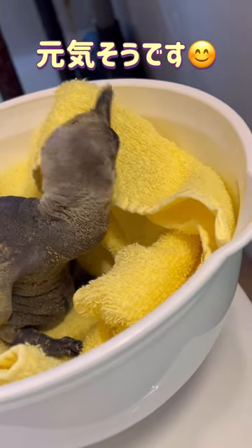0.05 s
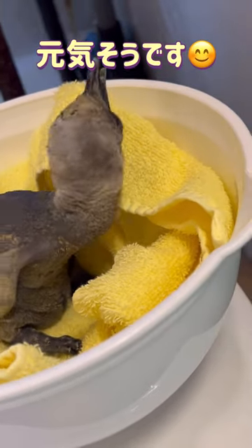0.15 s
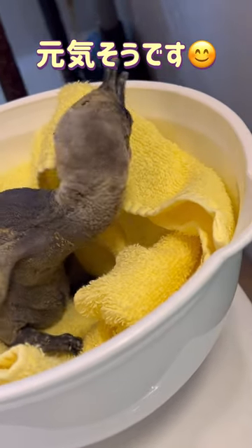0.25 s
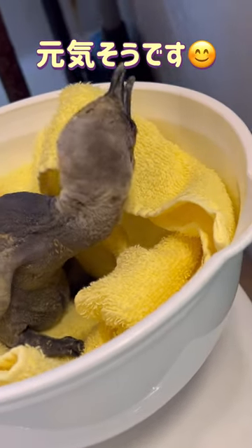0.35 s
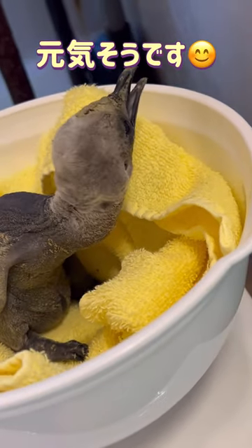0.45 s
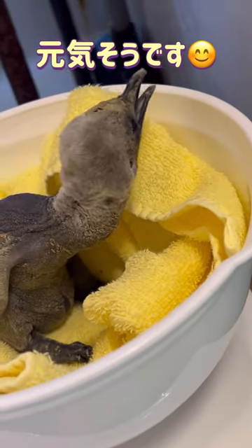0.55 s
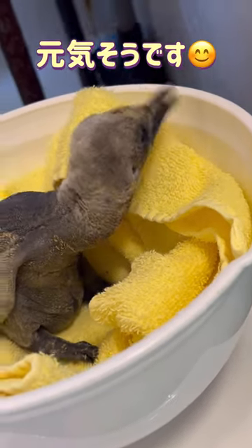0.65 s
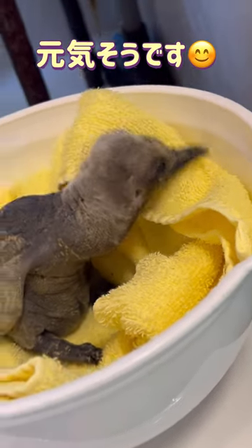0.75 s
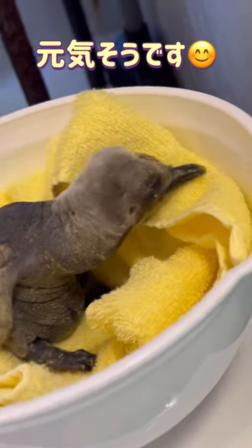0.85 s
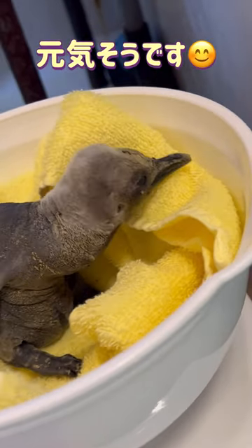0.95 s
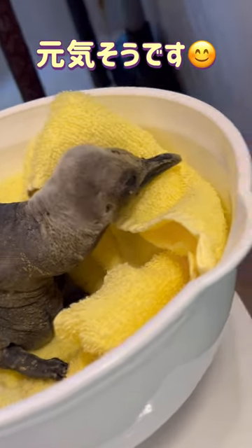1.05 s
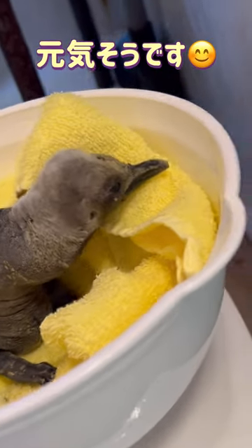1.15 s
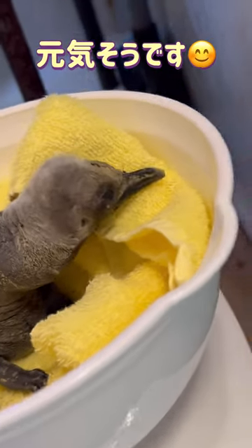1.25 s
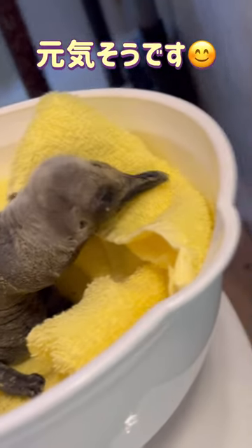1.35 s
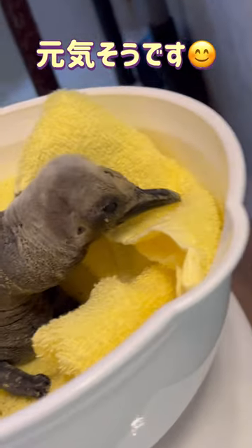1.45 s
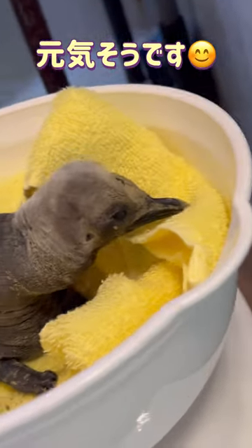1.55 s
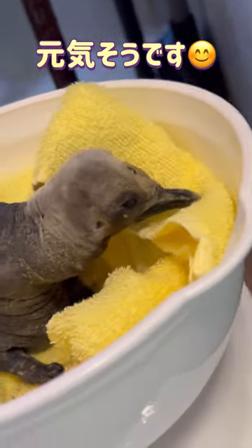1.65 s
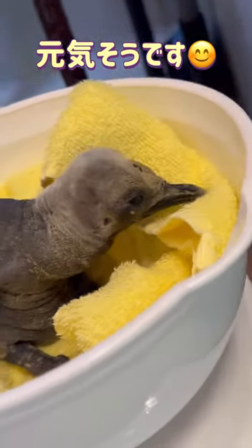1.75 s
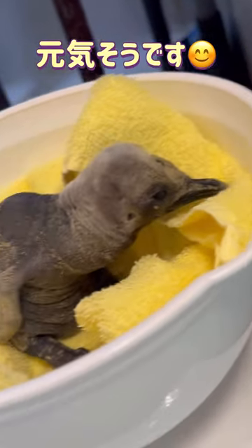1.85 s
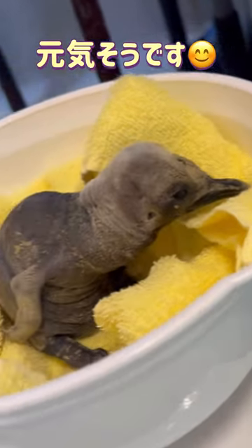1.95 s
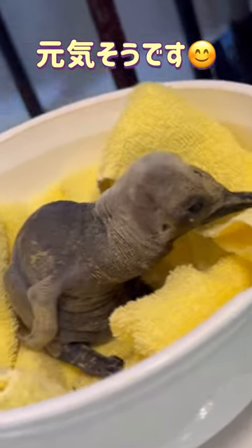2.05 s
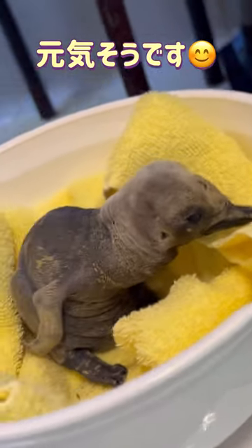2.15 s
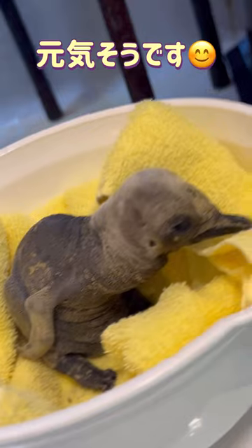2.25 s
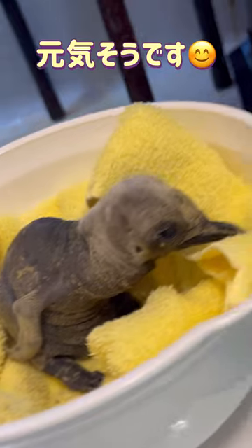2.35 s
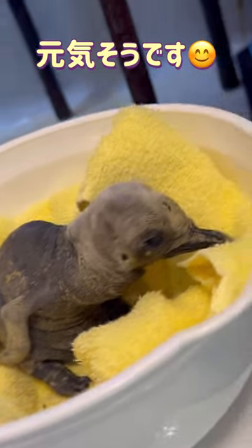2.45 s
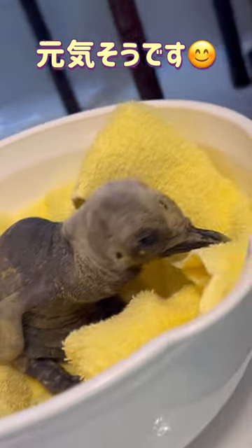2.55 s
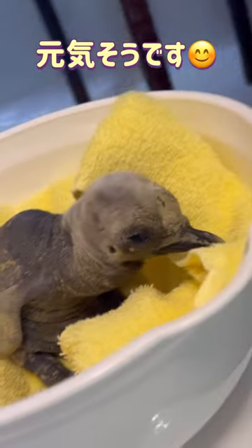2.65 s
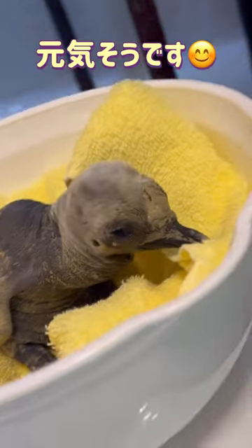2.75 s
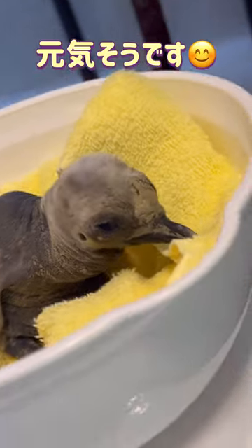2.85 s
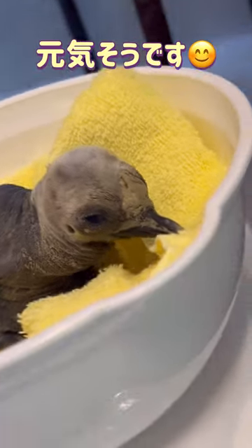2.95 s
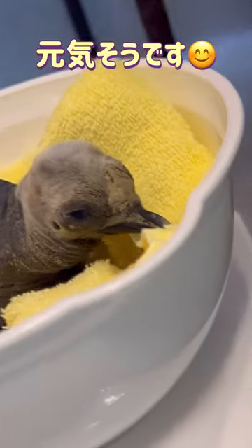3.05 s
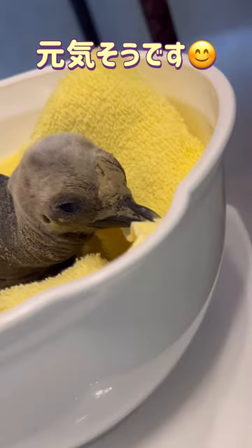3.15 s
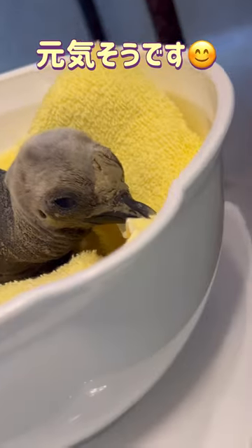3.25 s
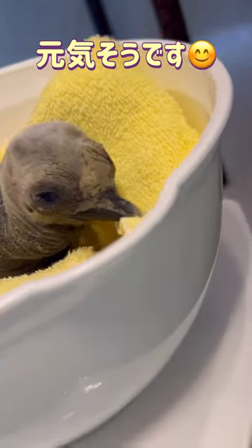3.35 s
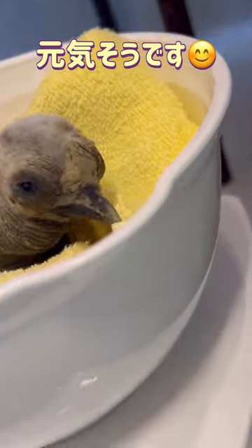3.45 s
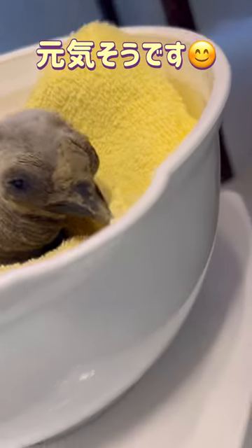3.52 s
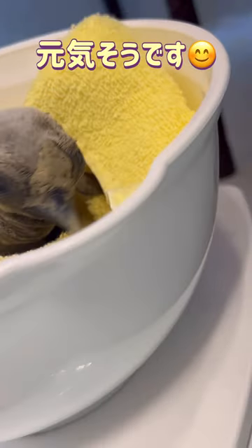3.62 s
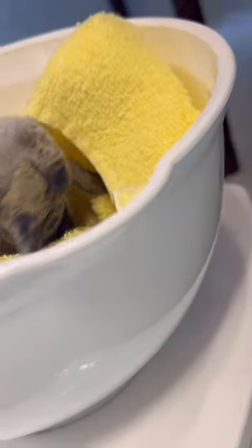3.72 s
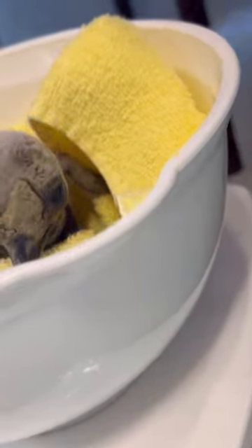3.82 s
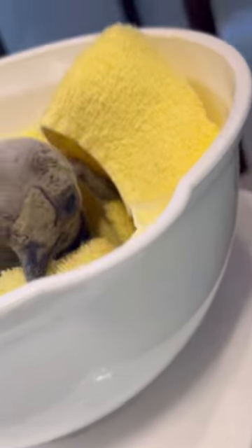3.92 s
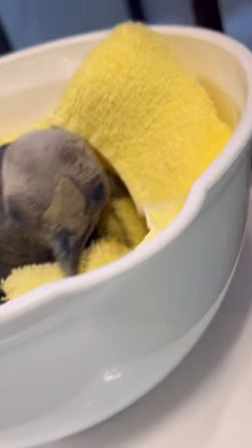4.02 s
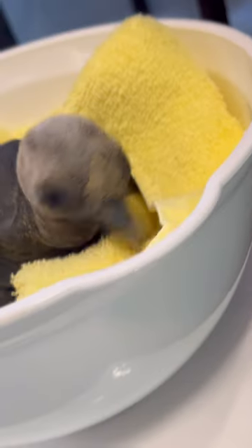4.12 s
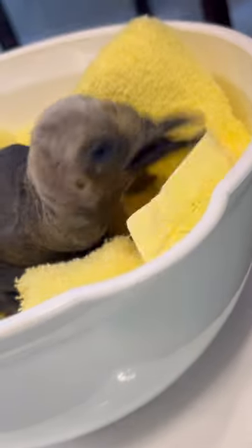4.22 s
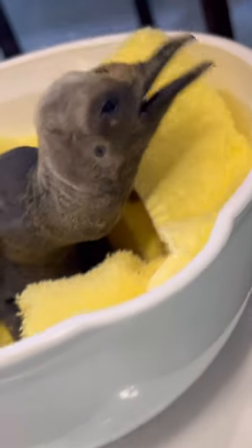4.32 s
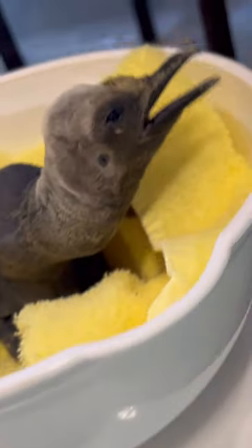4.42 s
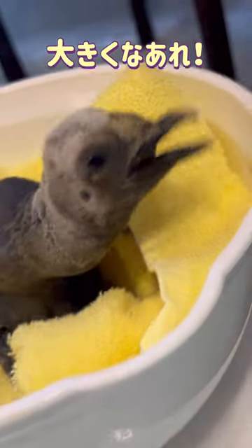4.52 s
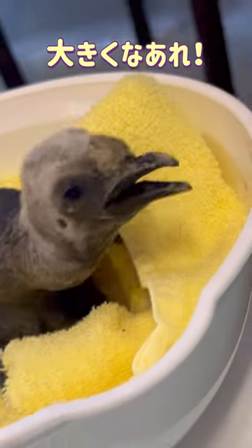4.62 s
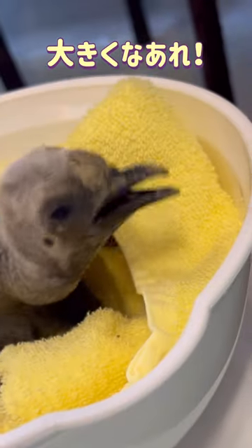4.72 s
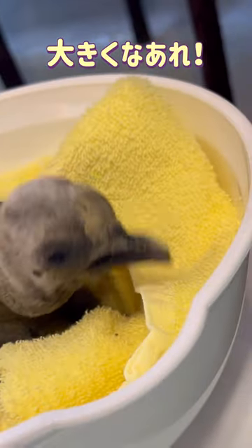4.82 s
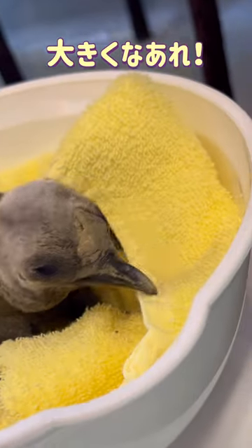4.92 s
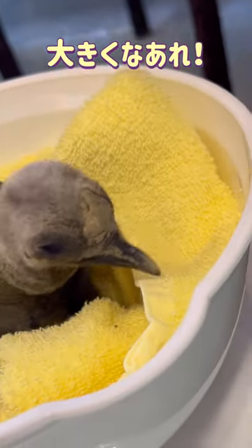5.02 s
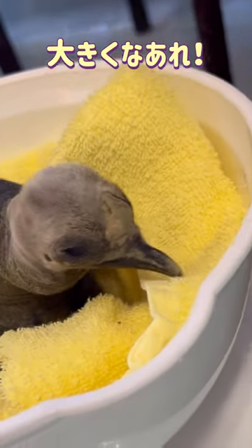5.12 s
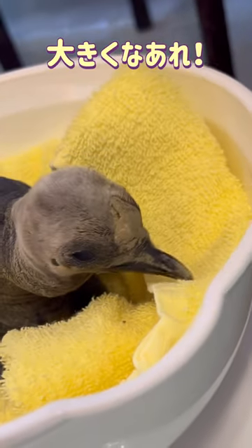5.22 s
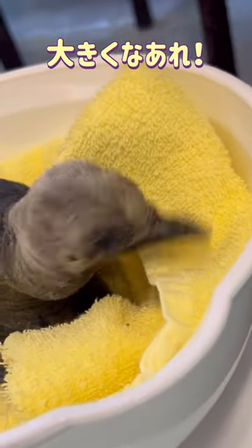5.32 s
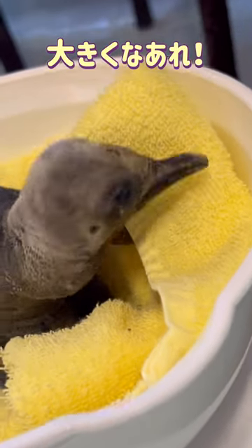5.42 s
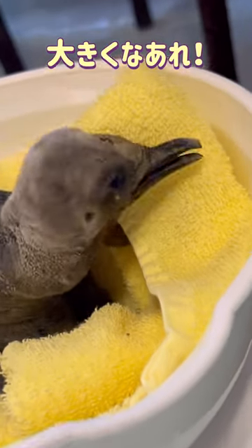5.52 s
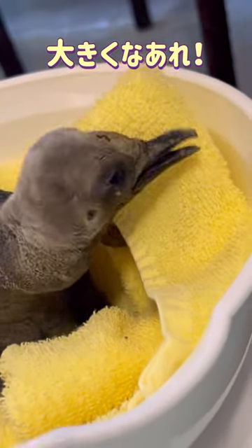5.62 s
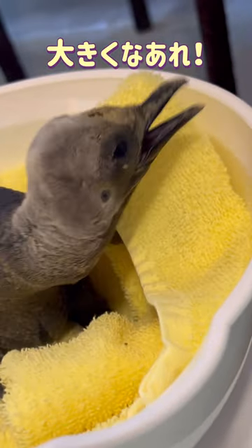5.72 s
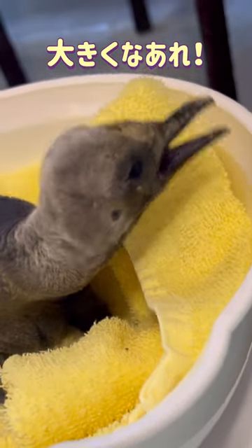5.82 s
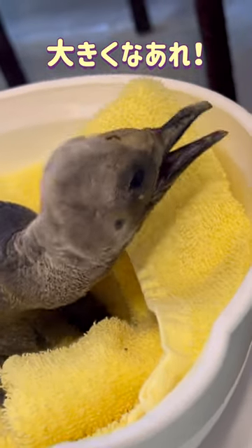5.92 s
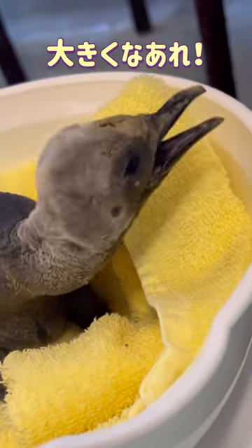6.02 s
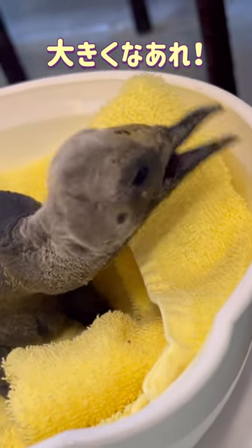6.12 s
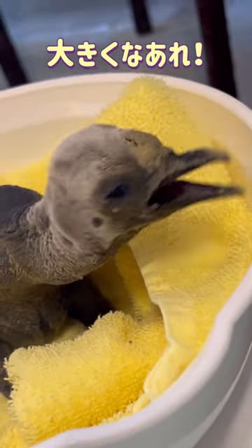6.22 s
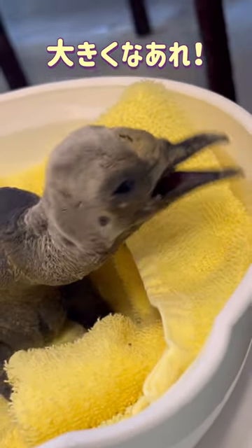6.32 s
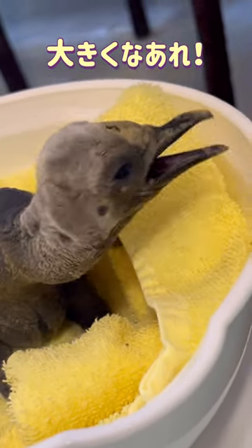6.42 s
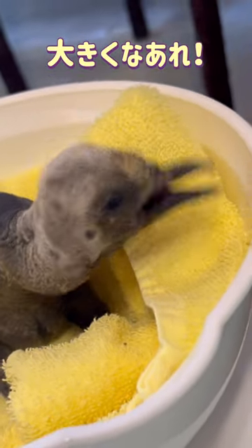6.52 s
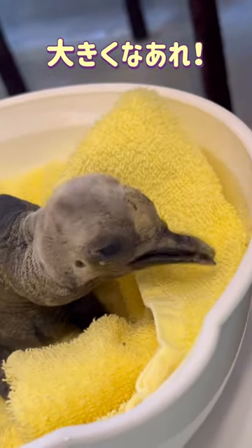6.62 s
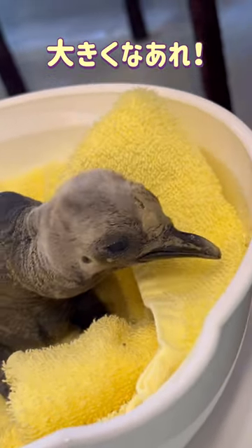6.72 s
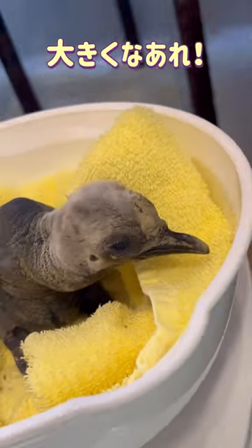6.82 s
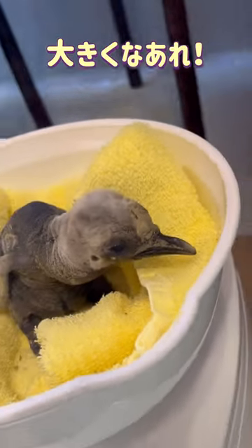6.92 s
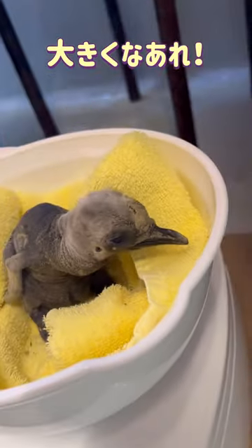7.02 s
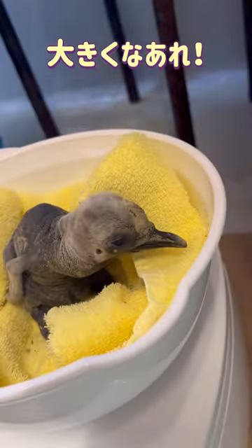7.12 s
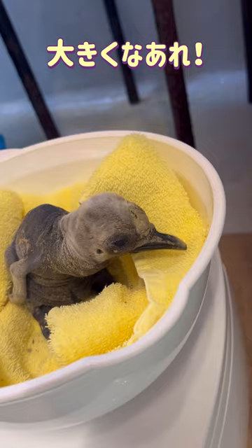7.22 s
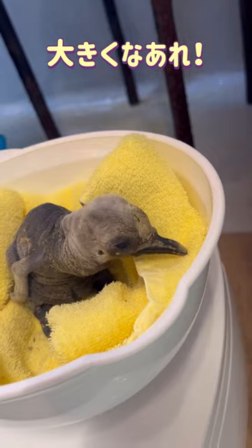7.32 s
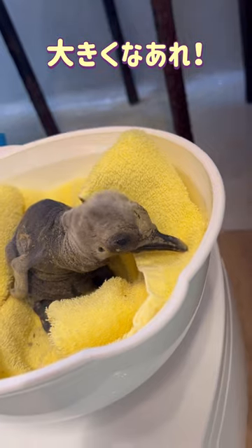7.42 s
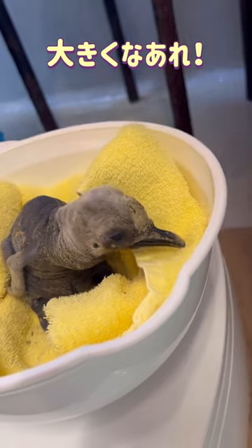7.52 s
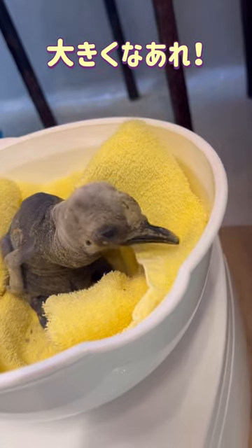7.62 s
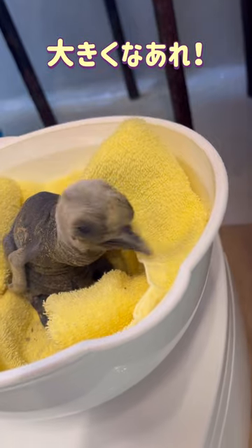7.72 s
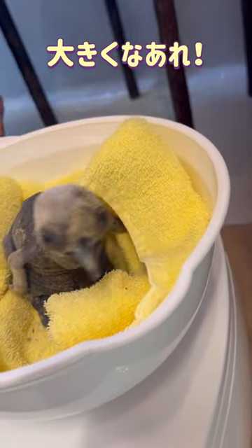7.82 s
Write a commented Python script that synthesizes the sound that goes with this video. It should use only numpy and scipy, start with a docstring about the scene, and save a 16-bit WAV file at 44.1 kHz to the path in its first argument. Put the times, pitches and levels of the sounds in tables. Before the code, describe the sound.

Steady ventilation drones indoors, its deep tones slowly beating. A baby bird gives one rough, broken whistle at the start, stays quiet while a small knock and very faint tick and cloth brush pass, then peeps rapidly three times, and soon after three more. Brief hard-walled echo follows the calls; a soft rustle closes the scene, heard by a nearby phone.

```python
"""Three bursts of hoarse, high whistles from a penguin chick ring briefly in a small hard room.
The voice is a membrane whistle with subharmonic repeats, throat rasp and breath noise.
Ventilation drones on: a wavering bass hum of two tones, a motor tone, duct resonances and a broad hiss.
A knock, two faint ticks and a brush are short noise bands; a late rustle is two swells of noise.
A phone with two microphone ports listens and filters their sum and difference."""
import sys
import numpy as np
from scipy import signal
from scipy.fft import rfft, irfft
from scipy.io import wavfile
from scipy.ndimage import uniform_filter1d

SR = 44100
rng = np.random.default_rng(int(sys.argv[2]) if len(sys.argv) > 2 else 0)


def dump(signal):
    """Clip the signal to [-1, 1] and save it as 16-bit WAV at the path in sys.argv[1]."""
    limited = np.clip(np.atleast_2d(signal).T, -1, 1)
    pcm = np.round(limited * 32767).astype(np.int16)
    wavfile.write(sys.argv[1], SR, pcm)


N = 346626

# Spells where the membrane repeats every two ("pairs") or three ("threes") cycles.
# Each row: start in seconds, end in seconds, kind of repeat, level in dB against the whistle.
REPEAT_SPELLS = [(0.219, 0.282, "pairs", -12.5), (0.294, 0.354, "threes", -23.),
                 (0.427, 0.476, "threes", -23), (0.468, .515, "threes", -15.5), (.53, 0.555, "pairs", -18),
                 (4.238, 4.285, "threes", -16), (4.294, 4.36, "pairs", -14.5),
                 (4.439, 4.475, "threes", -24), (4.53, 4.542, "threes", -21),
                 (4.555, 4.586, "threes", -17.5), (4.6, 4.623, "threes", -14.5),
                 (5.705, 5.836, "threes", -19), (5.766, 5.855, "pairs", -17), (5.988, 6.047, "threes", -18),
                 (6.184, 6.201, "threes", -23), (6.221, 6.222, "threes", -2), (6.289, 6.293, "threes", -5.),
                 (6.301, 6.349, "threes", -16.5), (6.29, 6.393, "pairs", -17)]
SPELL_RAMP_S, SPELL_FLOOR_DB = 0.0059, -53.5


def from_db(db):
    """Amplitude ratio of a level in dB."""
    return 10 ** (np.asarray(db) / 20)


def rms_one(x):
    """Scale to an rms of 1 over the whole length."""
    return x / np.sqrt(np.mean(x ** 2) + 1e-20)


def in_time(rows):
    """Rows of (second, values..) as one interpolated curve per value."""
    s, *columns = np.transpose(rows)
    return [np.interp(np.arange(N) / SR, s, c) for c in columns]


def between(t0, t1, rise_s, fall_s):
    """Up to 1 inside the span, with a linear ramp centred on each end."""
    t = np.arange(N) / SR
    return np.clip(np.minimum((t - t0) / rise_s + .5, (t1 - t) / fall_s + .5), 0, 1)


def coloured(spectrum):
    """Noise of the given spectrum, interpolated over log frequency; rms 1."""
    hz, level_db = np.transpose(spectrum)
    grid_hz = np.maximum(np.arange(N // 2 + 1) * SR / N, 1)
    gain = from_db(np.interp(np.log(grid_hz), np.log(hz), level_db, left=-90, right=-90))
    return rms_one(irfft(rfft(rng.standard_normal(N)) * gain, N))


def resonate(x, hz, width_hz):
    """Two passes through one resonance: steep skirts."""
    r = np.exp(-np.pi * width_hz / SR)
    b = np.array([1, 0, -1]) * (1 - r * r) / 2
    a = [1, -2 * r * np.cos(2 * np.pi * hz / SR), r * r]
    return signal.lfilter(b, a, signal.lfilter(b, a, x))


def band(x, low_hz, high_hz, order):
    """Butterworth bandpass."""
    return signal.sosfilt(signal.butter(order, [low_hz, high_hz], "band", fs=SR, output="sos"), x)


def wobble(rate_hz):
    """Random drift below rate_hz; rms 1."""
    return rms_one(signal.sosfilt(signal.butter(2, rate_hz, fs=SR, output="sos"), rng.standard_normal(N)))


def sine(cycles, level_db):
    """Sine of the given phase in cycles; the level is the rms."""
    return np.sqrt(2) * from_db(level_db) * np.sin(2 * np.pi * cycles)


def evened(x, window_s):
    """Rms held near 1 from moment to moment."""
    return x / np.sqrt(uniform_filter1d(x ** 2, size=max(round(window_s * SR), 1)) + 1e-12)


def chick():
    """A membrane whistle that slips into repeats of two or three cycles, with turbulent air in the throat."""
    # One curve per peep. Each row: time in seconds, whistle pitch in Hz, whistle level in dB,
    # throat rasp level in dB, octave level in dB.
    peeps = [
        [(0.198, 2863, -58, -33, -59), (0.218, 2874, -21, -21, -35), (0.24, 2984, -16.5, -23, -43),
         (0.26, 2855, -20, -24, -30), (0.272, 2730, -33, -20, -41), (0.286, 2672, -29, -32, -30),
         (0.298, 2920, -23.5, -28, -32), (0.312, 3177, -21, -18, -38), (0.33, 3001, -18.5, -33, -38),
         (0.344, 3093, -20, -21.5, -36), (0.376, 3068, -38, -23, -43), (0.388, 2853, -33, -26, -56),
         (0.398, 2931, -23, -21, -32), (0.41, 3184, -21, -26, -40.5), (0.44, 2783, -15.5, -30, -38),
         (0.466, 2755, -19, -33, -36), (0.476, 2720, -29, -21, -38), (0.49, 2576, -22.5, -27, -39),
         (0.504, 2323, -25.5, -27, -44), (0.514, 2247, -35, -29, -37), (0.538, 2179, -28, -34, -37),
         (0.56, 2226, -37, -36, -60), (0.566, 2297, -32, -41, -52.5), (0.576, 2368, -33, -47.5, -72),
         (0.594, 2620, -39, -50, -72), (0.612, 2765, -57, -63, -75)],
        [(4.238, 2123, -53, -26.5, -50.5), (4.268, 2554, -35, -16, -55), (4.278, 2739, -26, -24, -36),
         (4.302, 2990, -16, -23, -32), (4.336, 2984, -18, -22, -30), (4.35, 2858, -22, -18, -34),
         (4.36, 2819, -43.5, -21, -39), (4.385, 2990, -38, -38, -62)],
        [(4.418, 2833, -47, -30, -48), (4.424, 2858, -29, -19.5, -35), (4.434, 3054, -14, -20.5, -38),
         (4.446, 2795, -21.5, -20, -57), (4.462, 2684, -30, -17, -48), (4.485, 2663, -48, -31, -73)],
        [(4.515, 2772, -49, -23, -62), (4.529, 3027, -21, -17, -29), (4.537, 3164, -14, -18, -36),
         (4.567, 2680, -19, -35, -39), (4.591, 2865, -14, -23, -38), (4.603, 2733, -21.5, -31, -38),
         (4.611, 2560, -22, -25, -47), (4.621, 2361, -30, -24, -35), (4.653, 2048, -25, -30.5, -34),
         (4.677, 1880, -30, -38, -24.5), (4.697, 2045, -25.5, -49, -48), (4.711, 2119, -58, -62, -68),
         (4.73, 2038, -55.5, -58, -62)],
        [(5.694, 2385, -36, -22.5, -60), (5.708, 2944, -20, -22, -40), (5.73, 3029, -17, -24, -45),
         (5.748, 3194, -19, -26, -31), (5.79, 3224, -19.5, -19, -36), (5.82, 3250, -20, -22, -30),
         (5.836, 3027, -17.5, -19, -31), (5.858, 2907, -47, -23.5, -47), (5.88, 2972, -51, -39, -61)],
        [(5.973, 2970, -31, -27, -54), (5.993, 3259, -24, -16, -30), (6.003, 3066, -14, -28, -54),
         (6.029, 2510, -27, -31.5, -41), (6.055, 1867, -30, -25.5, -29), (6.069, 2439, -29, -24.5, -58),
         (6.079, 2900, -43, -31, -52), (6.09, 2942, -55, -45.5, -62)],
        [(6.178, 2815, -47.5, -30, -53), (6.186, 2825, -28, -12, -37), (6.198, 2873, -13, -22, -42),
         (6.216, 2865, -32, -16.5, -48), (6.232, 2973, -44, -36, -59)],
        [(6.279, 2710, -51, -26, -51), (6.287, 2750, -27, -13, -39), (6.299, 2850, -15.5, -26, -46),
         (6.309, 2680, -25, -23, -45.5), (6.345, 2390, -25.5, -28, -35), (6.373, 2303, -28.5, -30, -45.5),
         (6.403, 2420, -32.5, -42, -55), (6.427, 2597, -38, -69, -70), (6.455, 2350, -54, -57, -77)],
    ]
    hz, whistle_db, rasp_db, octave_db = in_time(np.concatenate(peeps))
    gates = [between(p[0][0], p[-1][0], rise_s=0.0043, fall_s=0.0072) for p in peeps]
    sounding = np.minimum(sum(gates), 1)
    cycles = np.cumsum(hz * (1 + 0.00498 * wobble(227.0))) / SR
    tone = whistle(cycles, hz, whistle_db, octave_db)
    voiced = flutter(cycles, width_hz=45., count=24)
    rasp = throat_rasp(voiced, rasp_db)
    return sounding * (tone + rasp + breath(voiced, rasp_db))


def whistle(cycles, hz, whistle_db, octave_db):
    """Fundamental, overtones and the fractional partials of the repeats, all locked to one phase."""
    # Partials. Each row: multiple of the whistle pitch, level in dB against its group's level.
    overtones = [(3, 0.1), (4, -7.)]
    halves = [(.5, -14.), (1.5, -1.), (2.5, -12.)]
    thirds = [(2 / 3, -.5), (5 / 3, -9.), (7 / 3, -11.), (8 / 3, -12.), (10 / 3, -16.)]
    overtone_db, fourth_db = -17, -3  # against the octave; four-thirds line against the thirds
    half_db = whistle_db + spell_db("pairs")
    third_db = whistle_db + spell_db("threes")
    tone = sine(cycles, whistle_db + 2.26 * wobble(117.0))
    tone += sine(2 * cycles, octave_db)
    tone += sines(cycles, overtones, octave_db + overtone_db)
    tone += sines(cycles, halves, half_db)
    tone += sines(cycles, thirds, third_db)
    four_thirds_db = third_db + fourth_db + lift_db(4 / 3 * hz) + 3.5 * wobble(80.)
    return tone + sine(4 / 3 * cycles, four_thirds_db)


def sines(cycles, partials, level_db):
    """Partials locked to one phase."""
    return sum(sine(k * cycles, level_db + db) for k, db in partials)


def spell_db(repeat):
    """Strength of one kind of repeat against the whistle."""
    gain = from_db(SPELL_FLOOR_DB)
    for t0, t1, kind, db in REPEAT_SPELLS:
        if kind == repeat:
            gain = gain + from_db(db) * between(t0, t1, SPELL_RAMP_S, SPELL_RAMP_S)
    return 20 * np.log10(gain)


def lift_db(hz):
    """Gain of the throat's main resonance where the four-thirds line crosses it."""
    centre_hz, half_width_hz, peak_db = 3640, 200, 16
    return peak_db / (1 + ((hz - centre_hz) / half_width_hz) ** 2)


def flutter(cycles, width_hz, count):
    """Unsteady repeats of up to six cycles: lines at sixths of the pitch, each swelling and fading alone."""
    lines = 0
    for k in range(3, count):
        if k % 6:  # whole multiples of the pitch are left out
            lines = lines + np.tanh(wobble(width_hz)) * np.sin(2 * np.pi * (k / 6 * cycles + rng.random()))
    return rms_one(lines)


def throat_rasp(voiced, rasp_db):
    """Flutter and puffing air ring the throat resonances; the rasp eases while a repeat holds."""
    # Throat resonances. Each row: centre in Hz, width in Hz, relative level in dB.
    throat = [(3610, 480, -0.5), (3470, 100, -6), (2987, 420, -7.5), (4220, 260, -10.5), (2210, 870, -37),
              (1694, 120, -14.5)]
    locked_drop_db = 6
    air = rng.standard_normal(N) * from_db(2.3 * wobble(72.0))  # the air comes in puffs
    source = voiced + from_db(-4.5) * air
    rasp = evened(sum(from_db(db) * resonate(source, hz, w) for hz, w, db in throat), window_s=0.017)
    spells = [between(row[0], row[1], SPELL_RAMP_S, SPELL_RAMP_S) for row in REPEAT_SPELLS]
    locked = np.minimum(sum(spells), 1)
    return from_db(rasp_db - locked_drop_db * locked) * rasp


def breath(voiced, rasp_db):
    """Turbulent hiss plus the flutter's treble, following part of the rasp's swing."""
    # Hiss spectrum. Each row: frequency in Hz, relative density in dB per Hz.
    hiss_spectrum = [(1200, -11), (1600, 3), (4000, 9), (6000, -3), (8500, -2.5), (10000, -15.5),
                     (12000, -3.5), (16000, -17.5)]
    follow_share, upper_share = 0.68, .7
    gain_db = -40.5 + follow_share * (rasp_db + 26)
    upper = rms_one(band(voiced, 5300., 9000., order=2))
    return from_db(gain_db) * (from_db(6.5) * coloured(hiss_spectrum) + upper_share * upper)


def room(x):
    """Dense echoes dying away, as a burst of decaying noise of unit energy."""
    t60_s, first_echo_s = 0.29, .006
    t = np.arange(SR // 2) / SR
    tail = rng.standard_normal(len(t)) * from_db(-60 * t / t60_s) * (t > first_echo_s)
    return signal.fftconvolve(x, tail / np.linalg.norm(tail))[:N]


def rustle():
    """Two soft swells of something dragged: a ringing low band and a grainy high band."""
    # Two drags. Each row: start in seconds, swell in seconds, low-band level in dB,
    # high-band level in dB, hold in seconds, fade in dB per second.
    drags = [(7.267, 0.094, -35.5, -40, 0.046, 77), (7.549, 0.052, -36, -38.5, 0.085, 41)]
    # High-band spectrum. Each row: frequency in Hz, relative density in dB per Hz.
    grain_spectrum = [(800, -0.5), (1300, -2.2), (2500, -6.5), (3100, -12.5), (4000, -9.5), (5500, -18.5),
                      (8000, -27)]
    # Resonances of the high band, in Hz.
    rings_hz = [1306, 2070, 2720, 3870]
    t = np.arange(N) / SR
    low_gain, high_gain = 0, 0
    for start_s, swell_s, low_db, high_db, hold_s, fade_db_per_s in drags:
        rise = np.clip((t - start_s) / swell_s, 0, 1) ** 2
        swell = rise * from_db(-fade_db_per_s * np.maximum(t - start_s - swell_s - hold_s, 0))
        low_gain = low_gain + from_db(low_db) * swell
        high_gain = high_gain + from_db(high_db) * swell
    white = rng.standard_normal(N)
    low = band(white, 280.0, 1060.0, order=2)
    low += from_db(11.0) * resonate(white, 390.0, 110.)
    low += from_db(9.0) * resonate(white, 527.0, 49.0)
    grain = coloured(grain_spectrum) * from_db(1.1 * wobble(40.))  # the drag catches and slips
    high = grain + sum(from_db(6.0) * resonate(grain, hz, 56.0) for hz in rings_hz)
    return low_gain * rms_one(low) + high_gain * rms_one(high)


def knocks():
    """A two-band knock and two faint ticks: noise bursts that start at once and decay exponentially."""
    # Each row: start in seconds, initial level in dB, lowest Hz, highest Hz, 60 dB decay in seconds.
    bursts = [(2.64, -37, 1600, 4000, 0.23), (2.645, -34.5, 170, 1240, 0.3), (2.9, -57., 4700, 8300, .12),
              (3.956, -46.5, 3100, 3640, 0.15)]
    t = np.arange(N) / SR
    out = np.zeros(N)
    for start_s, db, low_hz, high_hz, t60_s in bursts:
        fall = from_db(db - 60 * np.maximum(t - start_s, 0) / t60_s) * (t >= start_s)
        out += fall * rms_one(band(rng.standard_normal(N), low_hz, high_hz, order=2))
    return out


def brush():
    """A faint brush of cloth: banded noise with a quick rise and a slow fall."""
    # One row: start in seconds, rise in seconds, length in seconds, level in dB.
    stroke = (3.2, .04, .2, -56)
    start_s, rise_s, length_s, db = stroke
    swell = between(start_s, start_s + length_s / 2, rise_s, length_s)
    return from_db(db) * swell * rms_one(band(rng.standard_normal(N), 2500., 9000., order=2))


def fan_hum():
    """Two fans' bass tones beat together, each wavering in pitch and level."""
    # Slow swell. Each row: time in seconds, lower tone level in dB, upper tone level in dB.
    swell = [(0.0, -25, -29), (0.17, -24.5, -44.5), (0.26, -41, -26), (0.72, -19, -25), (1.58, -32, -26),
             (2.28, -21.5, -23.5), (2.49, -30, -33), (2.58, -49, -18.5), (2.91, -19, -29.5),
             (3.11, -19.5, -22), (3.17, -32, -56), (3.26, -34, -20.5), (3.61, -15.5, -38),
             (3.72, -27.5, -18), (4.73, -27, -30), (4.86, -13.5, -24.5), (5.03, -29, -14.5),
             (5.39, -29, -34), (5.45, -21, -20.5), (7.86, -31.5, -27)]
    # Mean pitches of the lower and upper tone, in Hz.
    tones_hz = [63.46, 72.17]
    waver_db, waver_hz = 3., 4.6
    hum = np.zeros(N)
    for hz, db in zip(tones_hz, in_time(swell)):
        cycles = np.cumsum(hz + 0.85 * wobble(3.32)) / SR
        hum += sine(cycles, db + waver_db * wobble(waver_hz))
    return hum


def motor_tone():
    """One swelling sine whose pitch drifts slightly."""
    # Each row: time in seconds, level in dB.
    swell = [(0.0, -32.5), (0.61, -52), (0.72, -36.5), (1.62, -26), (3.94, -32), (5.71, -31), (6.15, -49),
             (6.67, -30), (7.82, -25), (7.86, -18.5)]
    level_db, = in_time(swell)
    return sine(np.cumsum(172.5 + 0.39 * wobble(1.35)) / SR, level_db)


def duct_ringing():
    """Duct resonances, each rung by its own air noise."""
    # Each row: centre in Hz, width in Hz, level in dB.
    modes = [(34.5, 18, -44), (109.2, 19.2, -34.5), (151.35, 25.4, -37.5), (215.9, 13.4, -37.5),
             (230.8, 4.08, -42), (272, 10, -49), (77.4, 54, -44)]
    return sum(from_db(db) * rms_one(resonate(rng.standard_normal(N), hz, w)) for hz, w, db in modes)


def air_hiss():
    """Broad steady air noise, alike on both sides."""
    # Each row: frequency in Hz, relative density in dB per Hz.
    spectrum = [(25, -23), (120, 1), (300, 1), (600, -7.5), (1200, -15), (2500, -20.5), (4500, -28.5),
                (5600, -25.5), (8200, -25.5), (10000, -36.5), (12000, -34.5), (16000, -44)]
    return from_db(-39) * coloured(spectrum)


def air_difference():
    """Low room noise that differs between the sides."""
    # Each row: frequency in Hz, relative density in dB per Hz.
    spectrum = [(120, -34), (200, 7), (320, 0), (800, -1.5), (1400, -10), (1950, -17), (2200, -69)]
    return from_db(-46) * coloured(spectrum)


def scene():
    """Sources near the middle; duct and motor lean right, echoes, rustle and low noise differ by side."""
    voice, hum, far = chick(), fan_hum(), rustle()
    duct = motor_tone() + duct_ringing()
    mid = voice + from_db(-17) * room(voice)
    mid = mid + hum + duct + knocks() + brush() + far + air_hiss()
    side = -from_db(-20.5) * duct - from_db(-51.0) * hum + air_difference()
    side += from_db(-33.5) * band(room(voice), 1600.0, 4200., order=3)
    side += from_db(-4.0) * band(rustle(), 200., 4050.0, order=3)  # independent noise, same swells
    side -= from_db(-18.5) * band(far, 200., 1500., order=3)
    return np.array([mid + side, mid - side])


def record(dry):
    """Opposite phase at the two ports moves sound near 5 kHz and in the top octave from sum to difference."""
    mid, side = (dry[0] + dry[1]) / 2, (dry[0] - dry[1]) / 2
    side = side + from_db(1.0) * band(resonate(mid, 4940, 640), 4330, 6260, order=6)
    side = side + from_db(-2.5) * band(mid, 8100, 10300, order=6)
    side = side + from_db(6.5) * band(mid, 11100, 15000, order=4)
    b, a = signal.iirnotch(5050, 14., fs=SR)
    mid = 0.9 * signal.lfilter(b, a, mid) + 0.24 * mid  # partial notch
    mid = signal.sosfilt(signal.cheby2(12, 45, 12700, fs=SR, output="sos"), mid)
    cutoff_hz = 15800
    lowpass = signal.ellip(12, .5, 80, cutoff_hz, fs=SR, output="sos")
    return signal.sosfilt(lowpass, [mid + side, mid - side])


dry = scene()
out = record(dry)
dump(out)
```